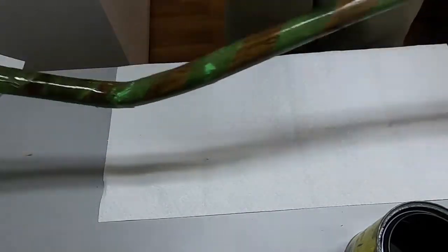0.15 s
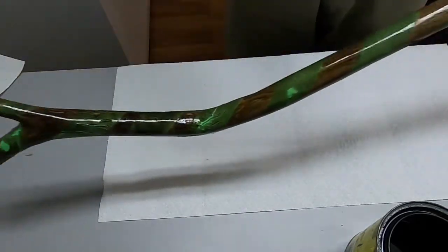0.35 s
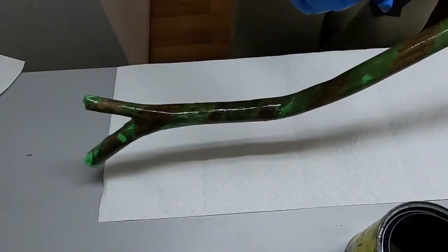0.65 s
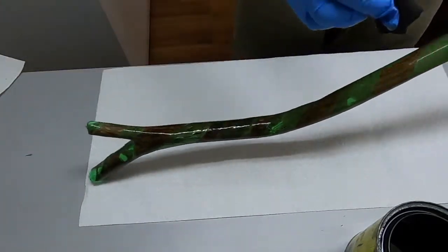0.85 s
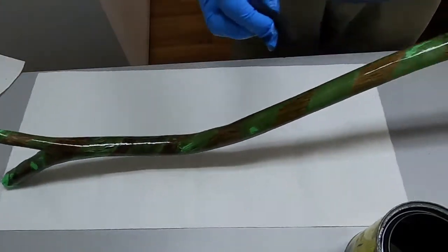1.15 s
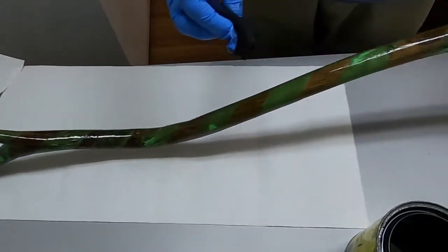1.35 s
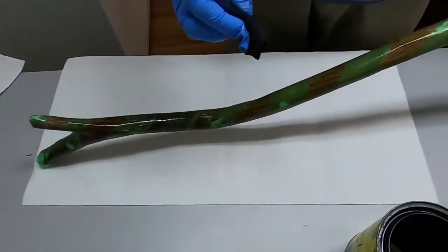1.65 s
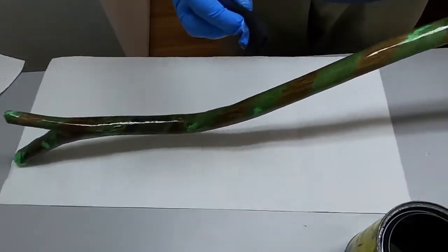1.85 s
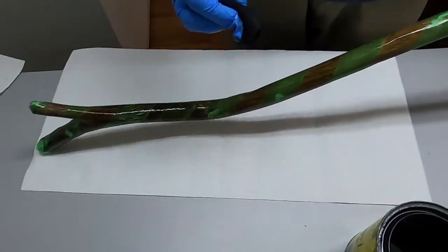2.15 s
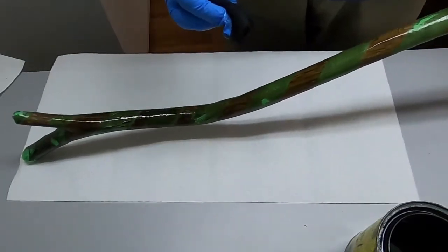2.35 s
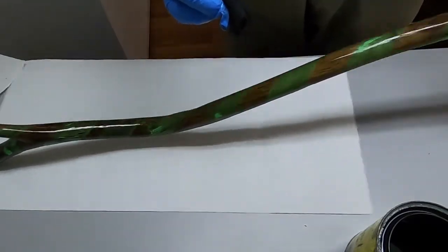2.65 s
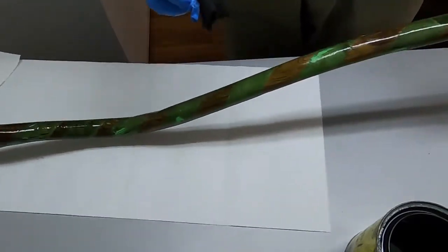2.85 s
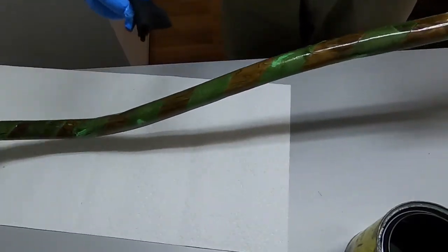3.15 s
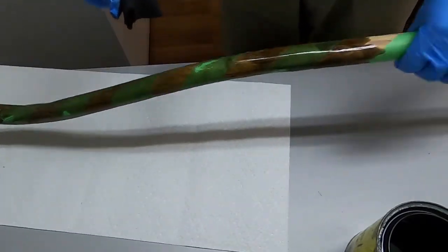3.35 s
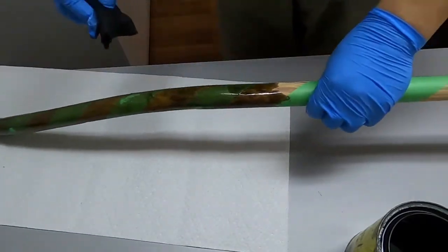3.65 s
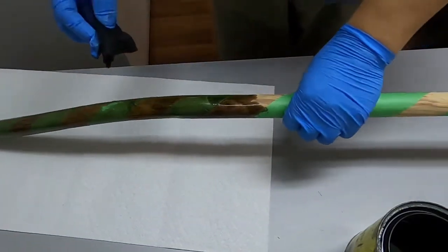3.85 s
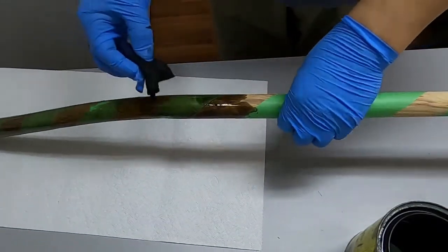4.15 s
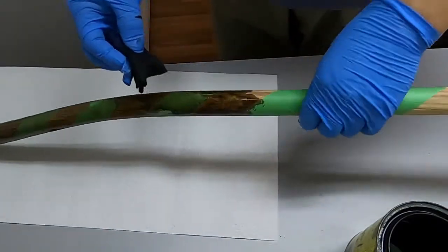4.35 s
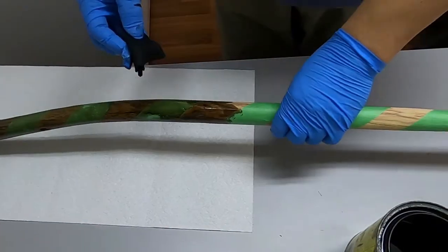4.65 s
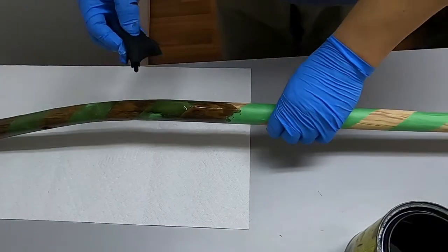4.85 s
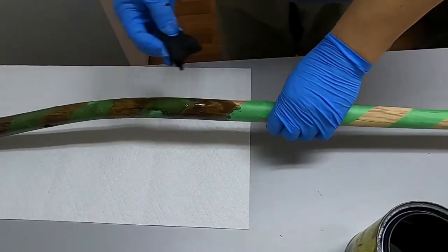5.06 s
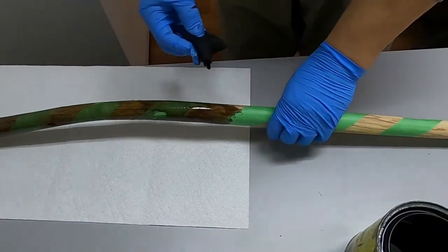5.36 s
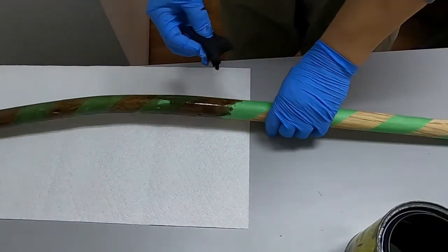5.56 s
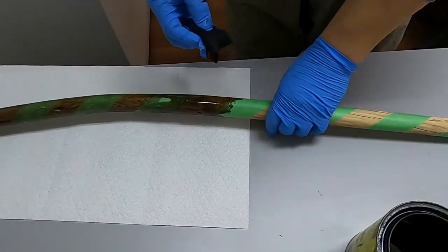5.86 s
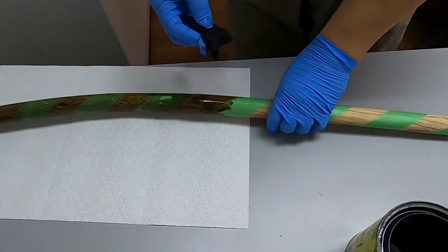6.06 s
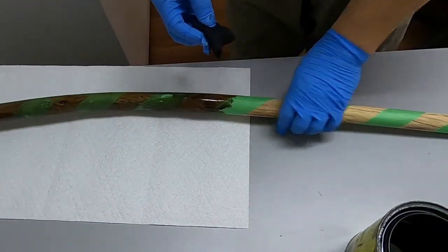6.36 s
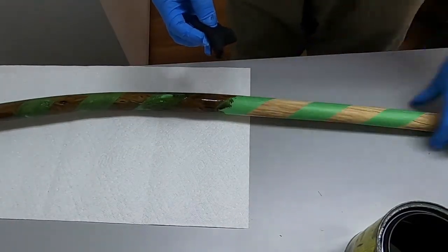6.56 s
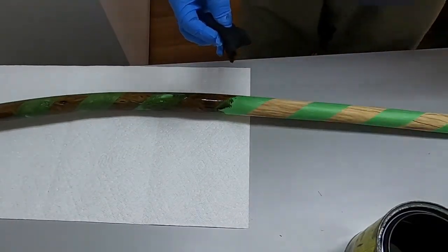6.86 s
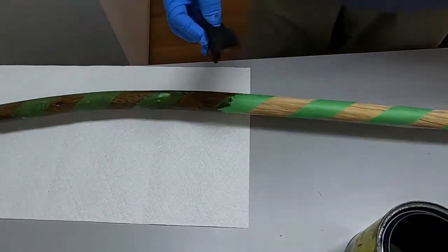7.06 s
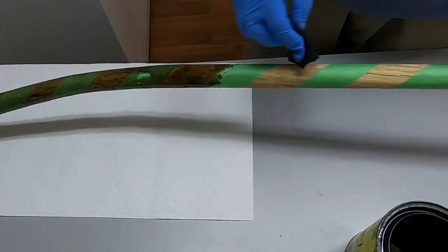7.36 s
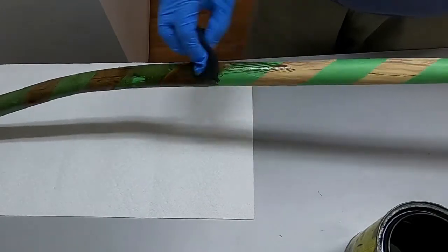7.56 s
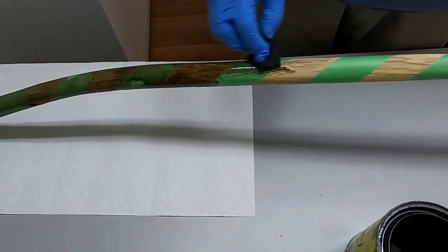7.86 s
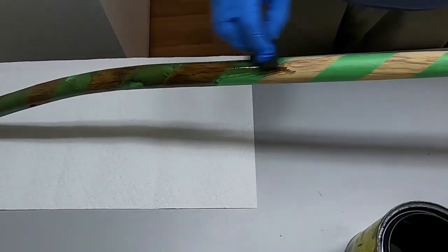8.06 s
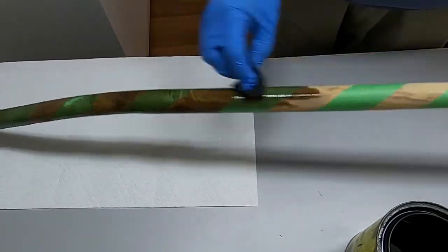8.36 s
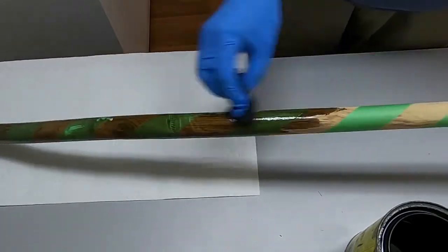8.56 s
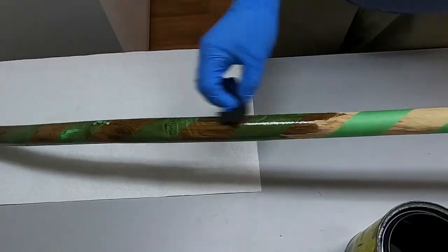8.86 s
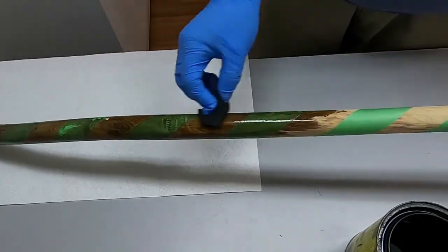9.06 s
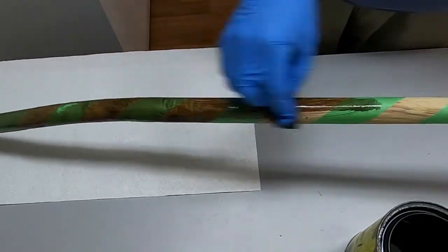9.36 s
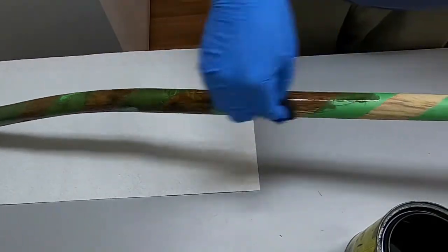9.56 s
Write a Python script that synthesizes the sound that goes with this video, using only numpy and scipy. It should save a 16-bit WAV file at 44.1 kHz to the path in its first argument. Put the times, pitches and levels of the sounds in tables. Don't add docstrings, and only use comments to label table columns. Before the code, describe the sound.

Close to a table in a small room, a constant low hum and soft fan wash continue throughout. A wooden stick thumps onto the paper-covered top and drags with dry scrapes and faint squeaks. Gloves shuffle and snap lightly, a few dull thuds and one sharp wooden knock follow. Finally a wet sponge rubs back and forth in brisk hissing strokes until the end.

```python
import sys
import numpy as np
from scipy import signal
from scipy.fft import rfft, irfft
from scipy.io import wavfile
from scipy.ndimage import uniform_filter1d

SR = 44100
rng = np.random.default_rng(int(sys.argv[2]) if len(sys.argv) > 2 else 0)


def volts_from_decibels(level):
    exponent = np.asarray(level, float) / 20
    return 10 ** exponent


def int16_out(signal):
    q = np.round(np.clip(np.atleast_2d(signal).T, -1, 1) * 32767)
    wavfile.write(sys.argv[1], SR, q.astype(np.int16))


N = 428211


def evened(x):
    return x / np.sqrt(np.mean(x ** 2) + 1e-20)


def read(points, hz):
    f, value = np.transpose(points)
    return np.interp(np.log(hz + 1), np.log(f + 1), value)


def add(mix, s, sound):
    part = mix[:, round(s * SR):][:, :sound.shape[-1]]
    part += sound[..., :part.shape[1]]


def panned(left_right_db):
    return volts_from_decibels(np.array([[left_right_db / 2], [-left_right_db / 2]]))


def port_pair(first, second, same, lag, hz):
    same = np.clip(read(same, hz), 0, 1)[:, None]
    late = np.exp(-2j * np.pi * hz * lag / SR)[:, None]
    right = same * first + np.sqrt(1 - same ** 2) * second
    return np.array([late * first, right])


def patches(shape, bins, frames):
    field = rng.standard_normal(shape[::-1]).T
    over_frequency = uniform_filter1d(field, bins, 0)
    return evened(uniform_filter1d(over_frequency, frames, 1))


def tones(turns, orders):
    total = 0
    for k, (multiple, db) in enumerate(orders):
        peak = np.sqrt(2) * volts_from_decibels(db)
        total = total + (-1) ** k * peak * np.cos(2 * np.pi * multiple * turns)
    return total


def hum():
    # multiple, level_db (rms)
    shaft_orders = [(1, -54.5), (2, -56.5), (3, -67), (4, -65.5)]
    mains_orders = [(1, -48), (2, -71)]
    fan_orders = [(1, -65), (2, -55), (3, -68), (4, -78)]
    # time_s, rate_hz
    fan_rate = [(0, 199.8), (1.9, 199.85), (2.6, 200.1), (4.2, 200.09), (5, 199.88), (9.71, 199.79)]
    t = np.arange(N) / SR
    shaft = 117.385 * (t - .00475)
    mains = 239.96 * (t - .00367)
    fan = np.cumsum(np.interp(t, *np.transpose(fan_rate))) / SR + .28
    slip = 1 - .18 * np.cos(2 * np.pi * (mains - 2 * shaft))
    return tones(shaft, shaft_orders) + slip * tones(mains, mains_orders) + tones(fan, fan_orders)


def air():
    # frequency_hz, density_db
    wash = [(30, -23), (95, -11), (130, -1), (250, 1), (470, -4), (530, -11), (1050, -10), (1300, -20),
            (1900, -23), (2300, -19), (3500, -27), (6000, -37), (10000, -45), (16000, -47)]
    # frequency_hz, width_hz, gain_db
    resonances = [(219, 10, 8), (295, 10, -5), (310, 6, 7), (328, 24, -6), (432, 8, 4), (456, 7, 13),
                  (665, 18, 6), (740, 50, -4), (812, 30, 2.5), (950, 35, 5), (1405, 25, 5), (1950, 50, -5),
                  (2005, 50, 4), (2190, 70, 2), (2650, 300, 1.5)]
    # frequency_hz, likeness (0-1)
    wash_likeness = [(40, 0.15), (110, 0.87), (380, 0.96), (700, 0.8), (1300, 0.87), (2400, 0.56),
                     (4400, 0.7), (15000, 0.11)]
    hz = np.fft.rfftfreq(8192, 1 / SR)
    a, b = (signal.stft(rng.standard_normal(N), nperseg=8192, noverlap=6144)[2] for _ in range(2))
    colour_db = read(wash, hz)
    for f, width, db in resonances:
        colour_db = colour_db + db / (1 + (2 * (hz - f) / width) ** 2)
    colour_db += 1.5 * patches((len(hz), 1), 6, 1)[:, 0] * (hz > 1150)
    z = port_pair(a, b, wash_likeness, 0.52, hz) * volts_from_decibels(colour_db)[:, None]
    wash_sound = signal.istft(z, nperseg=8192, noverlap=6144)[1][:, :N]
    return volts_from_decibels(-51) * evened(wash_sound)


def friction(control, grit_db, patchy_db):
    # frequency_hz, likeness (0-1)
    rub_likeness = [(2000, .85), (4000, .65), (8000, .58), (15000, .5)]
    slips = rng.standard_normal((2, N)) * volts_from_decibels(grit_db * np.minimum(rng.exponential(1, N), 6))
    hz, t, z = signal.stft(evened(slips), SR, nperseg=256, noverlap=192)
    db, scrape_db, hiss_db = control(t)
    level_db = db - 10 * np.log10(3500 / (SR / 2))
    low = np.clip(np.log2(7000 / (hz + 1)) / 1.18, 0, 1)[:, None]
    high = np.clip(np.log2((hz + 1) / 7000) / 0.85, 0, 1)[:, None]
    skirt_db = read([(300, 2), (1500, -2.5), (3000, -1.5), (12000, 1.5), (16000, -1)], hz)[:, None]
    field_db = level_db + low * (scrape_db + 2.5) + high * (hiss_db - 4.0) + skirt_db
    field_db += patchy_db * patches(z[0].shape, 5, 18)
    field_db += 1.9 * patches(z[0].shape, 2, 8)
    z = port_pair(*z, rub_likeness, 1.05, hz) * volts_from_decibels(field_db + 1.0)
    return signal.istft(z, nperseg=256, noverlap=192)[1][:, :N]


def strokes(t, rows, rise_s, fall_s):
    linger_s = 0.0058
    start, length, db, lean_db, colour_db = np.transpose(rows)[..., None]
    since = t - start + linger_s
    length = length + 2 * linger_s
    speed = np.clip(np.minimum(since / rise_s, (length - since) / fall_s), 0, 1)
    pressure_db = lean_db * np.clip(since / length - .5, -.5, .5)
    power = (speed * volts_from_decibels(db + pressure_db)) ** 2 + 1e-14
    total = power.sum(0)
    return 10 * np.log10(total), (power * colour_db).sum(0) / total


def sliding(t):
    # start_s, length_s, level_db (5.5-9 kHz), pressure_gain_db, scrape_db (relative)
    drags = [(.73, 0.057, -74.5, 0, 9), (0.78, 0.16, -78.5, 8, 17), (0.888, 0.53, -73, 3, 1.5),
             (1.391, 0.17, -69, 5, 5), (1.547, 0.24, -72.5, 8, 4.5), (1.778, 0.25, -71, -8, 5.5),
             (2.003, 0.1, -69.5, 0, 3), (2.096, 0.33, -72.5, -10, 3.5), (2.4, 0.1, -72, 3, 4),
             (2.487, 0.11, -69, 4, 6.5), (2.605, 0.21, -66, 6, 4.5), (2.81, 0.096, -70, -2, -3),
             (2.89, 0.24, -70.5, 1, -3.5)]
    # start_s, length_s, level_db (5.5-9 kHz), pressure_gain_db, scrape_db
    grips = [(3.5, .08, -80, -6, 9), (3.595, .035, -69, 0, 2), (3.62, .27, -74, 12, 4),
             (3.86, .13, -73, -10, -3), (3.98, .22, -79, 2, 4), (4.235, .19, -63, -2, -5),
             (4.4, .27, -73, 7, 2), (4.65, .05, -60, 0, -6), (4.68, .11, -70, -3, 0),
             (4.78, .07, -82, -8, 3), (5.37, .09, -79, 0, 0), (5.45, .14, -68, 4, 4),
             (5.65, .05, -77, 0, 3), (5.73, .12, -76, -10, 6), (5.93, .09, -76, -3, 3),
             (6.05, .08, -81, 0, 6), (6.215, .08, -73, -4, 0), (6.33, .09, -77, 0, 0),
             (6.43, .13, -66, 0, -7), (6.81, .14, -69, 0, -1), (6.945, .19, -71, -1, -4),
             (7.11, .36, -75, -1, 4)]
    db, scrape_db = strokes(t, drags + grips, rise_s=0.044, fall_s=0.045)
    hiss_db = np.where(t < grips[0][0], -3, -4.5)
    return db, scrape_db, hiss_db


def table():
    # start_s, level_db, contact_ms
    thuds = [(.802, -19, 1.77), (.855, -19, 1.35), (0.88, -19.5, 2.46), (0.8951, -28.5, 1.8),
             (0.91, -37, 2.1), (2.552, -42, 1.9), (3.672, -19, 3.6), (3.691, -53, 2.3), (3.707, -28, 3.94),
             (4.36, -30, 7.6), (5.226, -30, 2.7), (5.231, -21, 11.6)]
    # frequency_hz, level_db, t60_s, left_right_db
    table_modes = [(71.8, -12.5, 0.16, 2), (160, -6, 0.086, -4.5), (193, 2, 0.057, 1.5),
                   (243, -2, 0.079, -1), (324, -7, 0.085, 4), (419, -5.5, 0.07, -5), (454.6, 3.5, 0.085, 2),
                   (621, 0.5, 0.058, -6), (770, -16, 0.1, 10)]
    pushes, t = np.zeros((2, N)), np.arange(SR // 2) / SR
    for s, db, ms in thuds:
        push = signal.windows.hann(round(ms * SR / 1000))
        add(pushes, s, volts_from_decibels(db) * push / push.sum())
    ring = np.zeros((2, len(t)))
    for hz, db, t60, pan in table_modes:
        ring -= panned(pan) * volts_from_decibels(db - 60 * t / t60) * np.cos(2 * np.pi * hz * t)
    ring *= 1 - np.exp(-t / .0011)
    no_deep_bass = signal.butter(3, 54, "highpass", fs=SR, output="sos")
    return signal.sosfiltfilt(no_deep_bass, signal.oaconvolve(pushes, ring, axes=1)[:, :N])


def room(x):
    # frequency_hz, t60_s
    decay_times = [(100, 0.71), (500, .28), (2000, 0.14), (8000, 0.31)]
    taps = np.zeros((2, SR // 2))
    starts = np.arange(200, SR // 2 - 20, 20)
    at = starts + rng.integers(0, 20, (2, len(starts)))
    np.put_along_axis(taps, at, rng.choice([-1., 1.], at.shape), 1)
    taps[1] = 0.44 * taps[0] + 0.39 * taps[1]
    hz, t, z = signal.stft(taps, SR, nperseg=256)
    decay = volts_from_decibels(-60 * t / read(decay_times, hz)[:, None])
    tail = signal.istft(z * decay, SR, nperseg=256)[1]
    return signal.oaconvolve(x, tail / np.linalg.norm(tail[0]), axes=1)[:, :N]


def ticks():
    # start_s, level_db (peak), left_right_db
    snaps = [
        (0.8076, -56, 1.5),
        (0.8649, -50, 3.0),
        (4.2934, -44, 1.0),
        (4.6617, -44, 9),
        (4.6744, -46, 13),
        (6.99, -45, -2),
        (7.0646, -47.5, 3),
        (8.4701, -49, 7),
        (8.7174, -47, -0.5),
    ]
    out, t = np.zeros((2, N)), np.arange(1500) / SR
    band = signal.butter(2, [4000, 11000], "bandpass", fs=SR, output="sos")
    for s, db, pan in snaps:
        snap = signal.sosfilt(band, rng.standard_normal((2, len(t)))) * volts_from_decibels(db - 60 * t / 0.025)
        add(out, s, snap * panned(pan))
    return out


def squeaks():
    # start_s, length_s, frequency_hz,
    # width_hz, level_db
    catches = [(1.452, 0.12, 3200, 400, -64), (1.44, .07, 9500, 250, -72), (1.679, .04, 4100, 300, -61),
               (1.81, .06, 3500, 440, -62), (1.823, .04, 4170, 300, -65), (1.6, 1.2, 9500, 260, -80),
               (1.925, 0.042, 4400, 520, -64), (2.04, .04, 4200, 400, -70), (2.242, .06, 4400, 400, -69),
               (2.8, .05, 3000, 400, -65), (2.653, 0.084, 3400, 500, -60), (7.562, .05, 5900, 500, -65),
               (7.63, 0.057, 11000, 700, -59), (8.457, 0.041, 4800, 670, -57), (8.686, .05, 9200, 900, -63),
               (8.715, .04, 11400, 600, -64), (9.25, .1, 10000, 800, -64), (9.377, 0.1, 10000, 700, -62),
               (9.48, .06, 10300, 800, -73), (1.6, 0.48, 457, 35, -52), (2.615, 0.14, 1000, 470, -58),
               (3.671, 0.036, 2200, 2300, -55), (3.669, 0.031, 480, 160, -47),
               (2.72, 0.079, 2700, 420, -61)]
    out = np.zeros((2, N))
    for s, length, hz, width, db in catches:
        draw = rng.standard_normal(24000) + 0.5 * rng.standard_normal((2, 24000))
        band = signal.butter(2, [hz - width / 2, hz + width / 2], "bandpass", fs=SR, output="sos")
        whistle = evened(signal.sosfilt(band, draw))[:, :round(length * SR)]
        add(out, s, volts_from_decibels(db) * whistle * signal.windows.hann(whistle.shape[1]))
    return out


def sponging(t):
    # start_s, length_s, level_db (5.5-9 kHz), pressure_gain_db, wet_hiss_db (relative)
    rubs = [(3.72, .26, -77.5, 0, 1), (6.621, .19, -65.5, -4, 2.5), (7.446, .16, -69, 18, 1),
            (7.61, .1, -63.5, -3, 2), (7.711, 0.11, -63.5, -9, -1.5), (7.806, .1, -61.5, 10, 0.5),
            (7.916, .118, -61.5, -9, -2), (8.036, 0.14, -61, -2, 1.5), (8.179, 0.16, -62.5, -4, -1),
            (8.338, .2, -62, 3, -3), (8.519, 0.16, -67, 11, -6), (8.679, 0.11, -58.5, 0, -0.5),
            (8.781, .1, -59, 8, 0), (8.872, .1, -62.5, -7, -2), (8.97, 0.11, -62, 6, -2.5),
            (9.073, 0.14, -65, -2, -7), (9.212, .14, -62, 3, 3.5), (9.348, 0.12, -60.5, 1, 2),
            (9.468, 0.091, -61.5, -12, 3.5), (9.564, 0.085, -59.5, 5, 0), (9.649, .1, -61, -5, 1)]
    db, hiss_db = strokes(t, rubs, rise_s=0.032, fall_s=0.037)
    return db, -7.5, hiss_db


def stick():
    # start_s, level_db
    knocks = [
        (5.222, -27.5),
        (5.2394, -43),
    ]
    # frequency_hz, level_db, t60_s
    stick_modes = [(461.6, -5, 0.17), (607, -22, 0.22), (756, -15, 0.2), (1034, -2, 0.13),
                   (1118, 3.5, 0.084), (1160, -7, .15), (1360, -14, 0.093), (1545, -12, 0.18),
                   (1490, -12, .15), (1890, -15, 0.11), (2150, -6, 0.099), (2200, 5, 0.045),
                   (2620, -5.5, 0.059), (2960, -11, 0.061), (3280, -11, 0.055), (3440, -15, .12),
                   (3970, -12, 0.066), (4760, -22, 0.071)]
    # frequency_hz, level_db
    clatter = [(250, -28), (500, 6.5), (900, -0.5), (1200, 5.5), (1800, -2), (2300, -3.5), (3400, -4),
               (5000, -22), (12000, -45)]
    out, t = np.zeros((2, N)), np.arange(8192) / SR
    colour = volts_from_decibels(read(clatter, np.fft.rfftfreq(8192, 1 / SR)))
    crack_band = signal.butter(2, [2000, 9000], "bandpass", fs=SR, output="sos")
    sides = (-1) ** np.arange(len(stick_modes))
    for s, blow_db in knocks:
        angles = rng.uniform(-0.65, 1, (len(stick_modes), 2, 1)) * 0.36
        ring = 0
        for (hz, db, t60), angle, side in zip(stick_modes, angles, sides):
            ring = ring + side * volts_from_decibels(db - 60 * t / t60) * np.sin(2 * np.pi * hz * t + angle)
        hiss = rng.standard_normal(8192) + 0.68 * rng.standard_normal((2, 8192))
        buzz = evened(irfft(rfft(hiss) * colour)) * volts_from_decibels(-2.0 - 60 * t / 0.16)
        crack = volts_from_decibels(-11.5 - 60 * t / 0.019) * signal.sosfilt(crack_band, hiss)
        onset = np.minimum(t / 0.00021, 1)
        add(out, s, volts_from_decibels(blow_db) * (ring + buzz + crack) * onset)
    return out


def scene():
    thuds, knocks = table(), stick() + ticks()
    hits = thuds + knocks + room(volts_from_decibels(-16.0) * thuds + volts_from_decibels(-10) * knocks)
    slide = friction(sliding, grit_db=1.5, patchy_db=2.27)
    sponge = friction(sponging, grit_db=0.5, patchy_db=1.5)
    return hits + slide + sponge + squeaks() + hum() + air()


def band_limit(x):
    return signal.sosfilt(signal.butter(12, 16480, fs=SR, output="sos"), x)


def record(dry):
    buffer, first_gap = 4608, 2487
    kept = np.ones(N)
    kept[first_gap::buffer] = 0
    kept[first_gap - 1::buffer] = 0
    lowpass = signal.firwin(511, 15820, window=("kaiser", 9), fs=SR)
    limited = signal.oaconvolve(dry * kept, lowpass[None], "same")
    return band_limit(limited)


dry = scene()
out = record(dry)
int16_out(out)
```